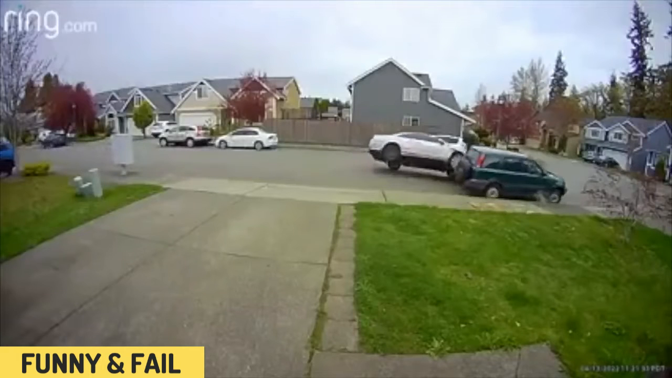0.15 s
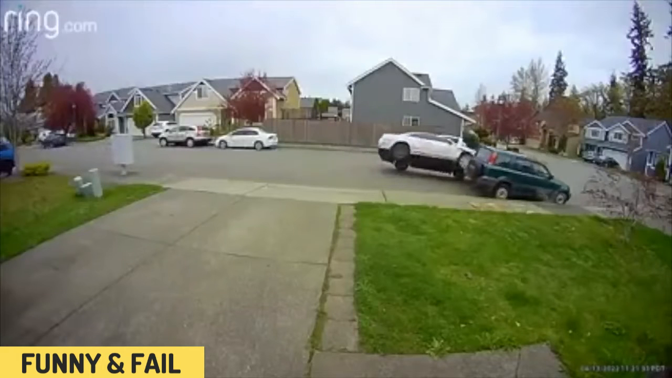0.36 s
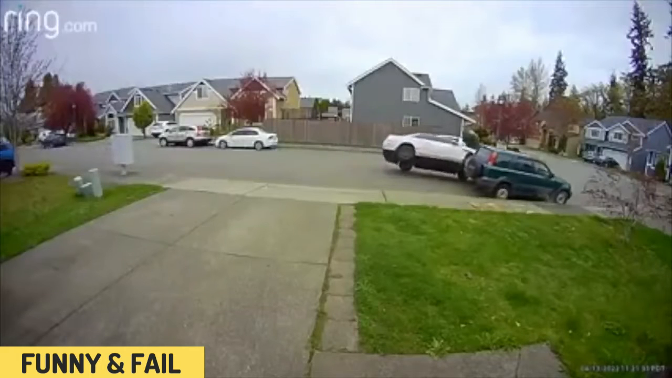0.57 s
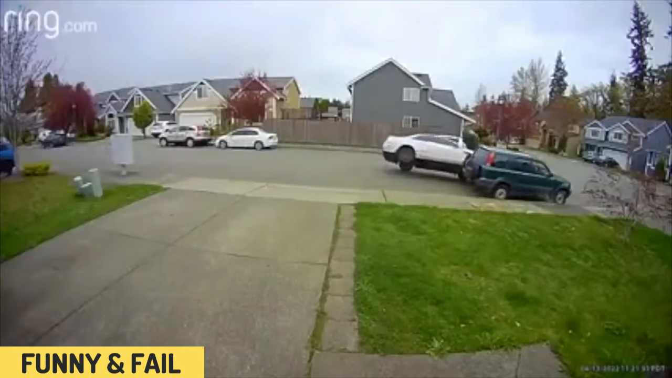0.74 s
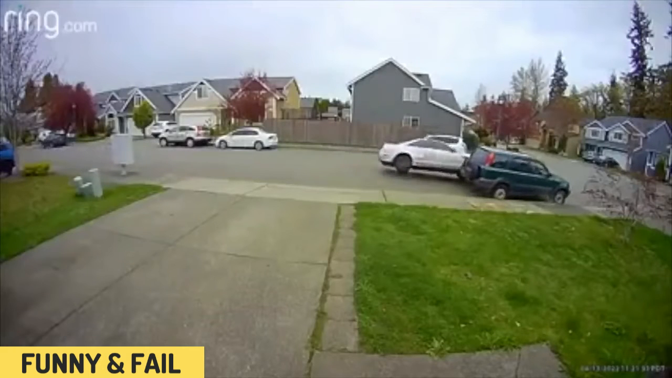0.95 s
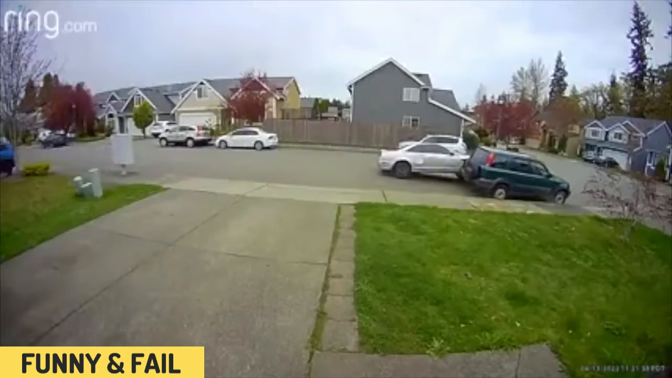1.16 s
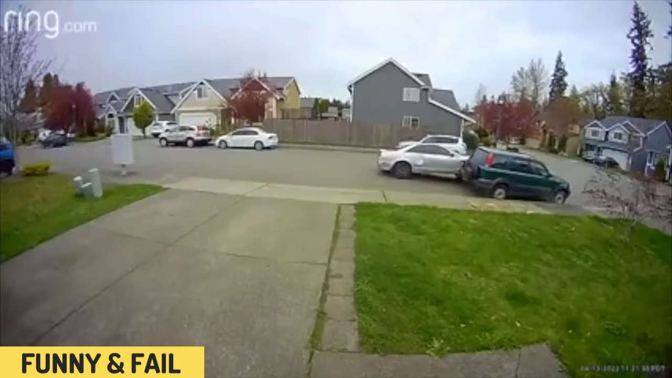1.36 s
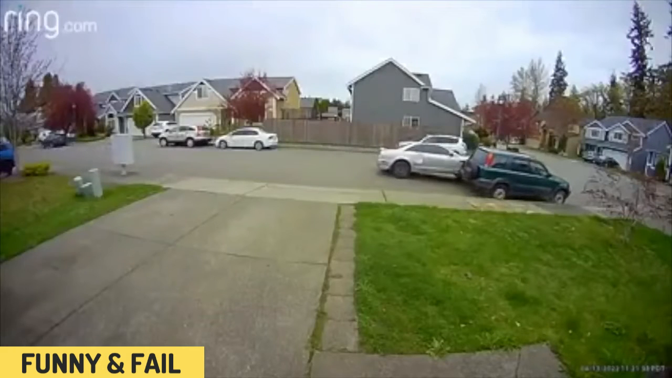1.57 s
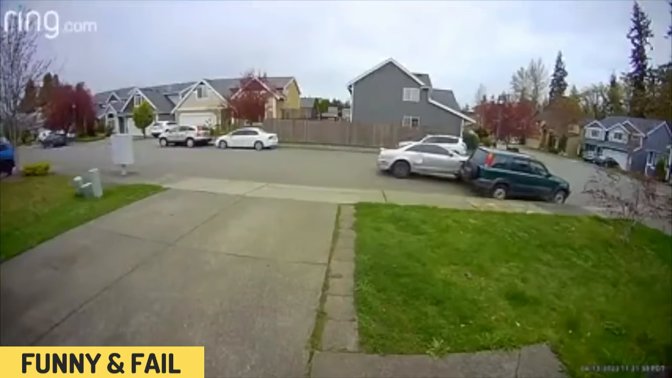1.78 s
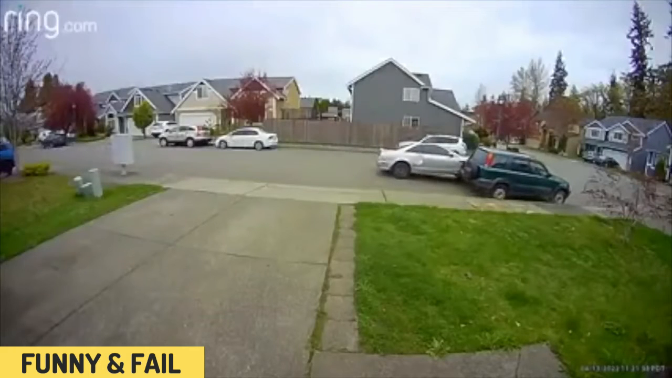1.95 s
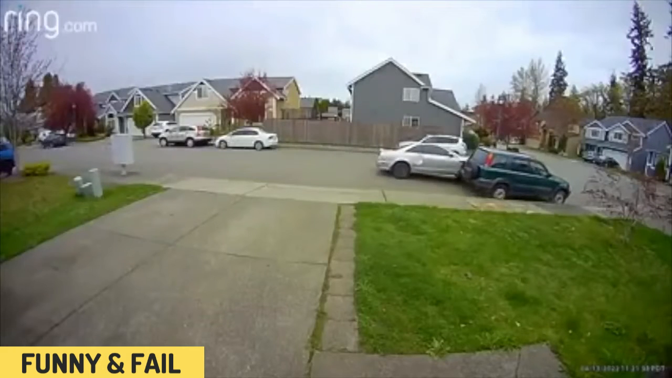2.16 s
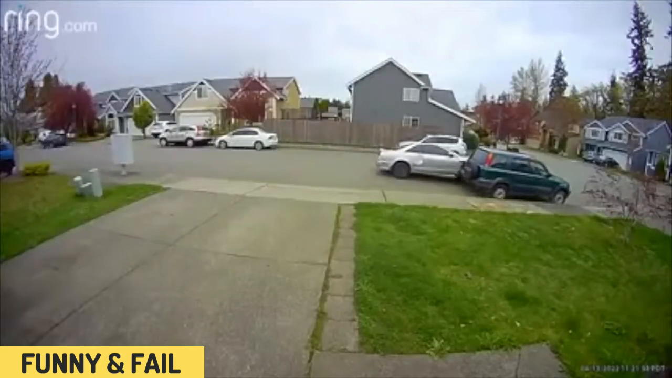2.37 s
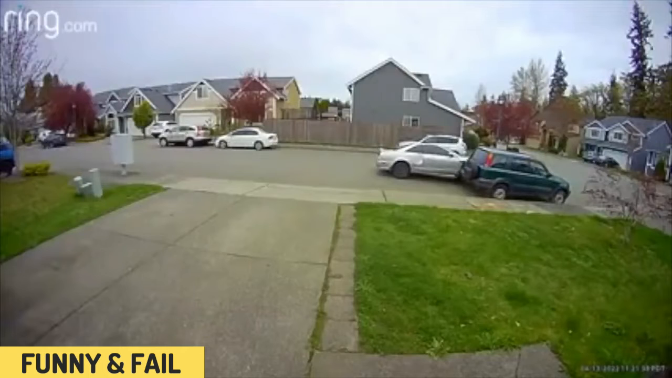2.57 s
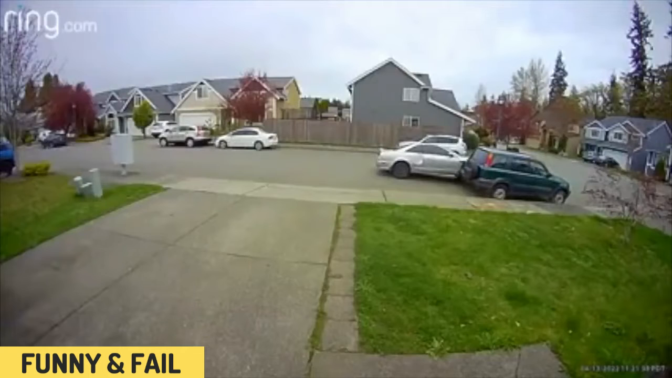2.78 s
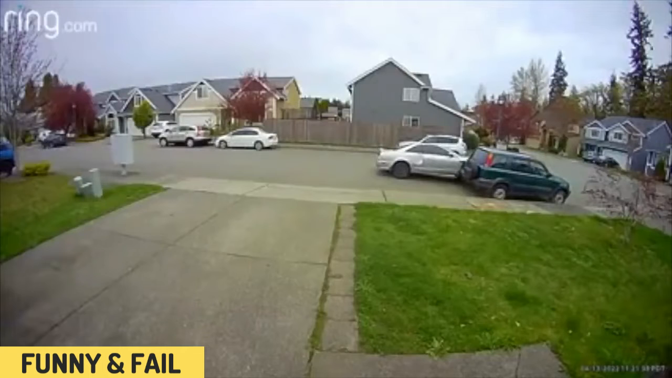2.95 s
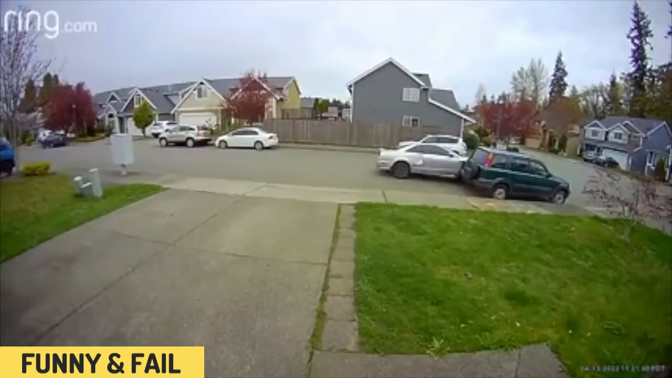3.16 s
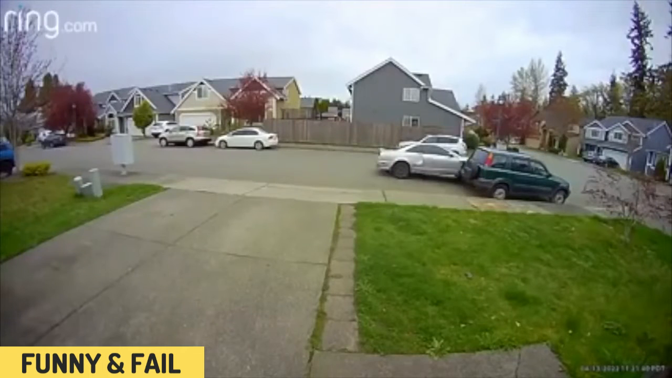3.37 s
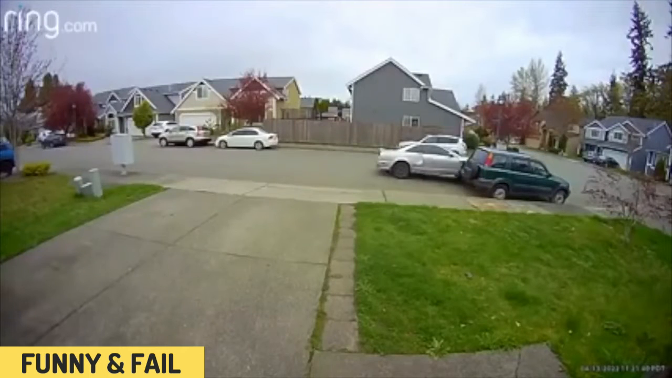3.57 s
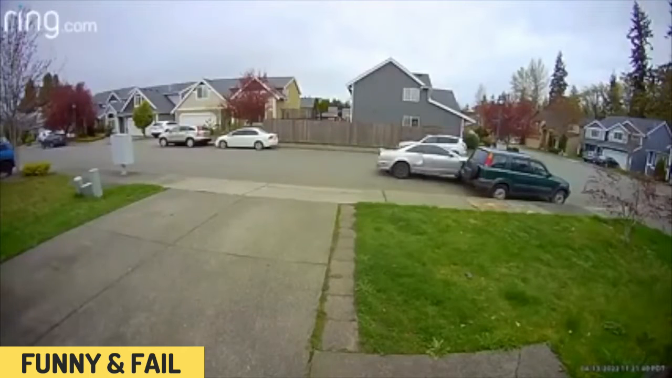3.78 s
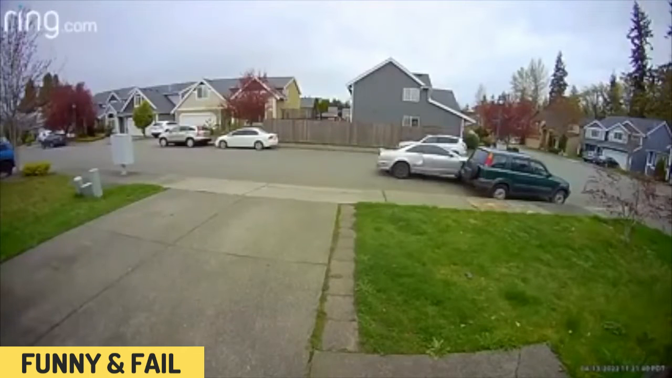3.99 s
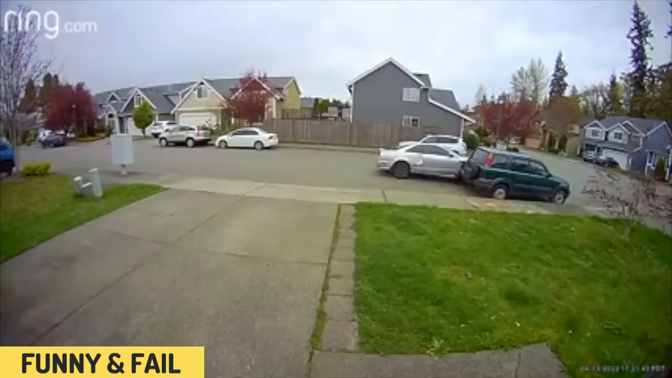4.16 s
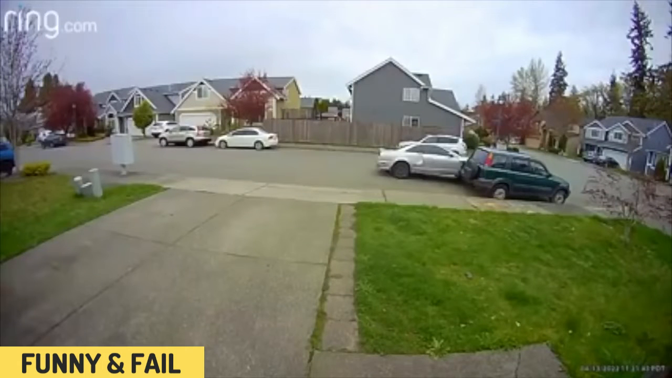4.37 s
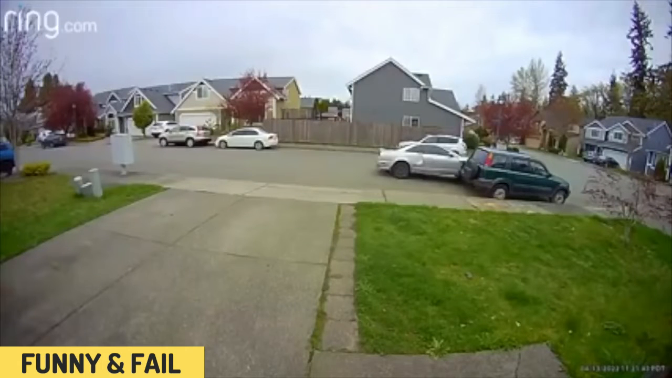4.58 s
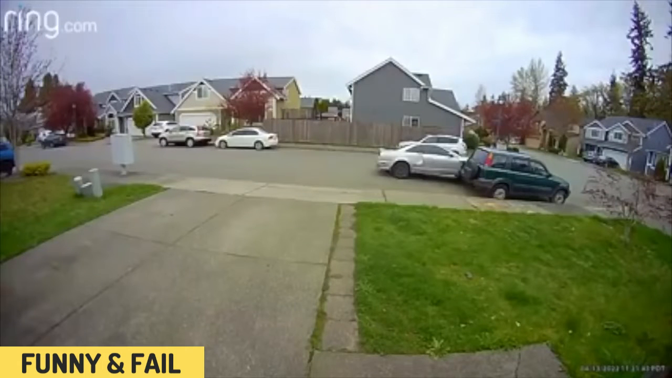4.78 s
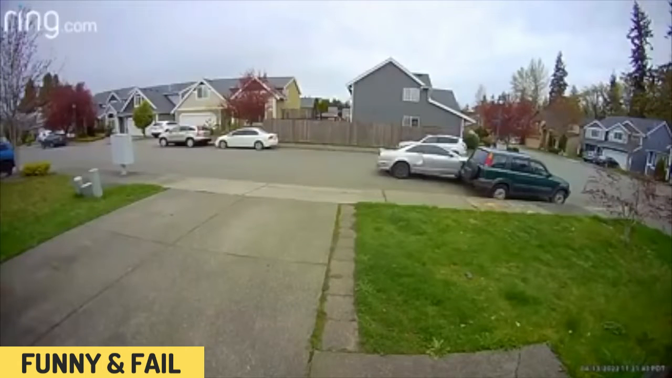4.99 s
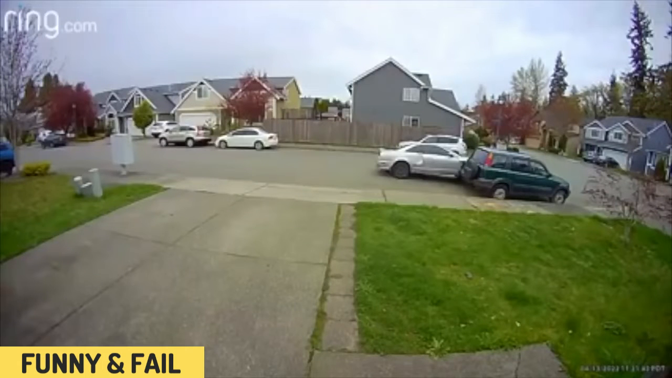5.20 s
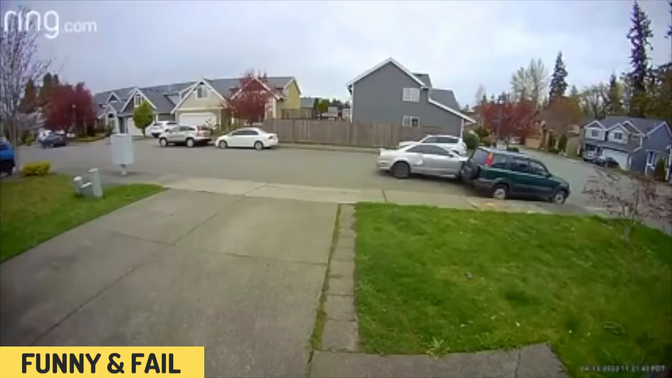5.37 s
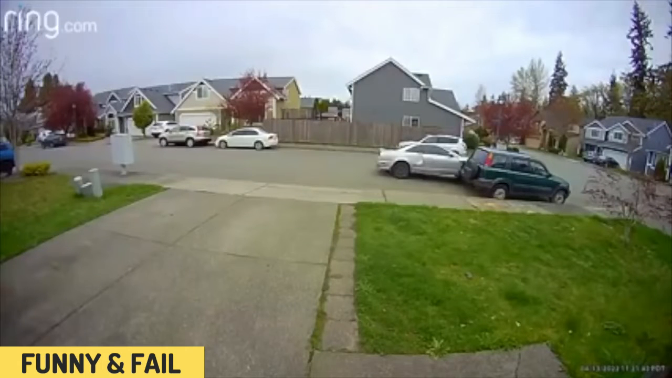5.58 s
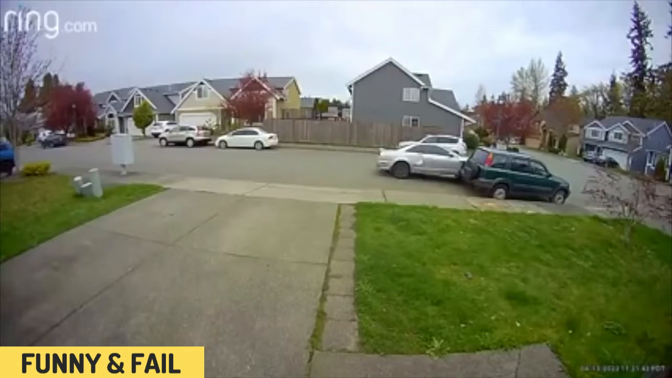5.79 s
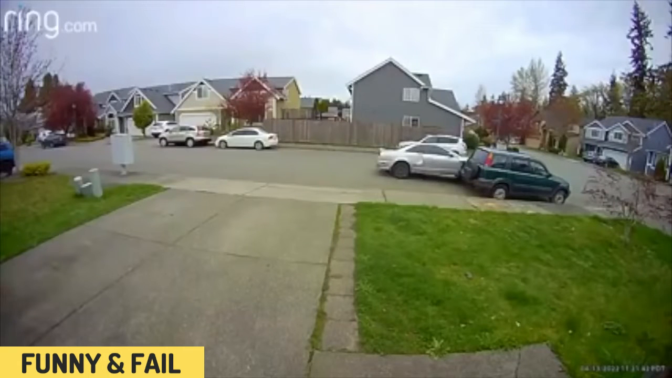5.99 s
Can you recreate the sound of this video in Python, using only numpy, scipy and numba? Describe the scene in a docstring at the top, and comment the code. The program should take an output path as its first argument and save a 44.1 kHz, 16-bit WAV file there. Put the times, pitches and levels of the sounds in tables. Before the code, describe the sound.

A car smashes into a parked car with a harsh, overloaded metal crunch, slams back down, scrapes and knocks to rest under thin microphone hiss.

```python
"""On a residential street a car rams a parked one, rides up on it, drops back and settles.
Random snaps and small rings make the crumpling panels boom and crackle; filtered noise makes parts scrape.
Knocks and taps ring metal parts, shards tick on the road, and a noise tail echoes it off house fronts.
A small outdoor camera hears it through a hissing microphone with a sharp treble resonance, and overloads."""
import sys
import numpy as np
from scipy import signal
from scipy.fft import rfft, irfft
from scipy.io import wavfile
from scipy.ndimage import uniform_filter1d
from numba import njit

SR = 44100
rng = np.random.default_rng(int(sys.argv[2]) if len(sys.argv) > 2 else 0)


def store_wav(level_fs):
    """Save 16-bit WAV to argv[1]."""
    pcm = np.round(np.clip(np.atleast_2d(level_fs), -1, 1) * 32767)
    wavfile.write(sys.argv[1], SR, pcm.T.astype(np.int16))


N = 266319
T = np.arange(N) / SR


def undb(db):
    """Turn decibels into a gain."""
    return 10 ** (np.asarray(db) / 20)


def unit(x):
    """Scale to an average (rms) level of 1."""
    return x / np.sqrt(np.mean(x ** 2))


def steady(x, span_s):
    """Hold the rms level near 1 over spans of the given length."""
    power = np.abs(uniform_filter1d(x ** 2, int(span_s * SR) + 1))
    return x / np.sqrt(power + 1e-9)


def noise():
    """White noise of rms 1."""
    return rng.standard_normal(N)


def colour(x, points):
    """Filter x to the spectrum drawn by (Hz, dB) points, without changing the power of white noise."""
    hz, db = np.transpose(points)
    size = 4096
    grid_hz = np.arange(size // 2 + 1) * SR / size
    gain = undb(np.interp(np.log(grid_hz + 1), np.log(hz), db))
    # fold the cepstrum so that the filter never sounds ahead of its input
    cepstrum = irfft(np.log(gain))
    cepstrum[1:size // 2] *= 2
    cepstrum[size // 2 + 1:] = 0
    response = irfft(np.exp(rfft(cepstrum)))
    return signal.fftconvolve(x, response / np.linalg.norm(response))[:N]


def dull(x, hz):
    """A softer contact loses the treble above hz."""
    return signal.lfilter(*signal.butter(2, min(hz, .4 * SR), fs=SR), x)


def wander(span_s):
    """A value of spread 1 that drifts at random over spans of the given length."""
    size = int(span_s * SR) + 1
    return unit(uniform_filter1d(uniform_filter1d(noise(), size), size))


def flutter(span_s, depth_db):
    """A gain that wanders with a spread of so many dB."""
    return undb(depth_db * wander(span_s))


def ebb(db, fall_db_s, from_s=0):
    """A gain that holds until from_s, then loses so many dB each second."""
    return undb(db - fall_db_s * np.maximum(T - from_s, 0))


def swell(s, length, rise=0.93):
    """A push that builds, holds and lets go; rise is a share of the length."""
    out, span = np.zeros(N), slice(max(int(s * SR), 0), int((s + 2 * length) * SR))
    age = np.maximum(T[span] - s, 0) / length
    out[span] = (1 - np.exp(-age / rise)) * np.exp(-age ** 4)
    return out


def fade(s, t60):
    """Die away from a moment of contact, losing 60 dB in t60 seconds."""
    out, span = np.zeros(N), slice(int(s * SR), int((s + 2 * t60) * SR))
    out[span] = np.exp(-np.log(1000) * (T[span] - s) / t60)
    return out


def ring(modes):
    """All the notes of an object after one tap, with a peak of 1."""
    t = T[:SR // 2]
    out = sum(undb(db - 60 * t / t60) * np.sin(2 * np.pi * hz * t) for hz, db, t60 in modes)
    return out / np.abs(out).max()


def strike(taps, modes):
    """Ring an object's modes with taps of (s, dB)."""
    force = np.zeros(N)
    for s, db in taps:
        force[int(s * SR)] += undb(db)
    return signal.fftconvolve(force, ring(modes))[:N]


def resonance(x, s, hz, q):
    """One resonance excited by x, at an even level, from 0.05 s before s to 0.25 s after it."""
    out, span = np.zeros(N), slice(int(s * SR) - SR // 20, int(s * SR) + SR // 4)
    b, a = signal.iirpeak(hz, max(q, 1), fs=SR)
    once = signal.lfilter(b, a, x[span])
    out[span] = steady(signal.lfilter(b, a, once), 0.014)  # filtered twice: a narrower note
    return out


def fractures(rate, spread_db):
    """Random tiny snaps, so many per second: many weak, a few strong."""
    size = undb(spread_db * np.minimum(rng.exponential(size=N), 4))
    return unit((rng.random(N) < rate / SR) * size * np.sign(noise()))


@njit
def grains(start, hz, t60, size):
    """Add up small decaying rings, each a turning, shrinking complex number."""
    out = np.zeros(N)
    for k in range(len(start)):
        pole = np.exp((2j * np.pi * hz[k] - np.log(1000) / t60[k]) / SR)
        z = size[k] + 0j
        for i in range(int(start[k]), min(N, int(start[k] + t60[k] * SR))):
            z *= pole
            out[i] += z.imag
    return out


def fragments(count, t60, spread_db):
    """Snaps at random moments; each rings a piece of its own pitch, most of them weakly."""
    when, pitch, life, luck = rng.random((count, 4)).T
    size = undb(spread_db * np.minimum(-np.log(luck), 4))
    hz = 200 + 7000 * pitch
    return unit(grains(when * N, hz, t60 * (.5 + life), size))


# The sound colour of crumpling metal. Each row: pitch in Hz, relative level in dB.
METAL_COLOUR = [(170, -37.5), (300, -3), (430, -0.5), (560, -4), (900, 2.5), (1200, -3.5), (1480, -2),
                (1850, -1), (2900, -3), (3600, -6), (4700, -13.5), (5600, -19), (7000, -46)]
# The colour of the hollow bodies booming. Each row: pitch in Hz, relative level in dB.
BOOM_COLOUR = [(90, -51), (160, -11), (195, -6.5), (235, 4), (275, 1), (340, -14.5), (480, -31),
               (900, -61.5)]
# The colour of splintering plastic and glass. Each row: pitch in Hz, relative level in dB.
SPLINTER_COLOUR = [(3000, -33.5), (4800, -9.5), (5450, 0.5), (5850, 4.5), (6500, 1), (6850, -12.5),
                   (7400, -46.5)]
# the crush starts at full force and dies away as the cars slow: level at 0 s (dB), fall (dB per s)
CRACKLE_DB, CRACKLE_FALL_DB_S = -10, 25
BOOM_DB, BOOM_FALL_DB_S = -22, 14.5
SPLINTER_DB, SPLINTER_FALL_DB_S = -15, 28.5
# single buckles stand out of the crush: level (dB re the crackle), size spread (dB)
BUCKLE_DB, BUCKLE_SPREAD_DB = -5, 3.5


def crumple():
    """Panels buckle in dense snaps, plastic and glass splinter, the hollow bodies boom."""
    metal_snaps = fragments(count=15000, t60=0.15, spread_db=0.5) + undb(1.5) * fractures(3200, 2)
    crackle = steady(colour(metal_snaps, METAL_COLOUR), 0.045)
    boom = steady(colour(fractures(500, 8.3), BOOM_COLOUR), .03)
    brittle_snaps = fragments(count=14000, t60=0.093, spread_db=2.5) + fractures(2400, 6.2)
    splinter = steady(colour(brittle_snaps, SPLINTER_COLOUR), 0.024)
    crackle = crackle + undb(BUCKLE_DB) * buckles()
    crackle = crackle * flutter(span_s=0.008, depth_db=0.5)  # the metal gives way in jerks
    crush = crackle * ebb(CRACKLE_DB, CRACKLE_FALL_DB_S)
    crush = crush + boom * ebb(BOOM_DB, BOOM_FALL_DB_S)
    crush = crush + splinter * ebb(SPLINTER_DB, SPLINTER_FALL_DB_S)
    return crush * (1 - settled())


def buckles():
    """Folds of sheet metal pop one by one, each with a brief note of its own."""
    when, pitch, luck = rng.random((900, 3)).T
    size = undb(BUCKLE_SPREAD_DB * np.minimum(-np.log(luck), 3))
    hz = 650 * 5 ** pitch
    cycles = 34  # each note fades by 60 dB in this many vibrations
    return steady(grains(when * N, hz, cycles / hz, size), .12)


# the crush gives way to grinding: middle and length of the handover (s)
SETTLE_S, HANDOVER_S = 0.893, 0.083


def settled():
    """Share of the motion that has passed from crushing to grinding, 0-1."""
    return np.clip((T - SETTLE_S) / HANDOVER_S + .5, 0, 1)


# Short knocks, from hard blows to faint taps, with a click on either side of the brief cut-out.
# Each row: start in seconds, length in seconds, boom in dB, crack in dB,
# pitch of the ringing part in Hz, its level in dB, Hz above which the crack is dulled.
KNOCK_EVENTS = [(0.051, .008, -29.5, -24, 1150, -15, 5000), (0.074, 0.031, -32.5, -22, 846, -15.5, 5000),
                (0.129, 0.026, -25, -24, 700, -20, 4000), (0.248, 0.047, -29.5, -26, 572, -21.5, 5000),
                (0.37, 0.012, -23, -19, 1026, -11.5, 5040), (0.467, 0.0053, -25, -28, 421, -20.5, 3000),
                (0.524, 0.0028, -35, -15, 2520, -9.5, 6500), (0.554, .004, -37, -23, 960, -18, 5000),
                (0.646, 0.0039, -36, -26.5, 2630, -15, 6500), (0.674, 0.0093, -30, -21.5, 1720, -14, 5000),
                (.689, 0.0067, -38.5, -20.5, 2250, -16.5, 6000), (0.699, .005, -37, -25, 2080, -18.5, 6000),
                (0.744, 0.012, -32, -22, 1000, -22, 3000), (1.0233, 0.0077, -22, -17.5, 2520, -13, 8000),
                (1.026, 0.007, -26, -17, 1100, -17, 3500), (1.038, 0.008, -25, -20.5, 2400, -25, 4020),
                (1.793, 0.019, -26, -27, 895, -22, 2600), (1.809, 0.018, -48, -34.5, 1740, -35, 2600),
                (1.926, 0.067, -43, -36, 318, -34.5, 6000), (2.267, 0.066, -46, -47, 990, -38.5, 1300),
                (2.285, 0.011, -19.5, -45, 765, -36.5, 1300), (2.304, 0.018, -26.5, -30, 314, -18.5, 2210),
                (2.322, 0.018, -31, -27, 710, -31, 2000), (2.336, 0.0075, -39, -32, 960, -35, 1800),
                (2.354, .018, -46, -53, 680, -33.5, 1810), (2.377, 0.027, -42, -50, 382, -33, 1390),
                (2.402, 0.07, -48, -51, 790, -50, 1310), (2.829, 0.023, -43.5, -43, 1100, -45.5, 5000),
                (2.871, 0.007, -38.5, -35.5, 650, -35, 3980), (4.63, 0.089, -74, -76, 383, -62, 1985)]
# The colour of a cracking contact. Each row: pitch in Hz, relative level in dB.
CRACK_COLOUR = [(170, -24.5), (320, -3.5), (680, 3), (1100, 6), (1420, -13.5), (1800, -2), (2400, -4),
                (3000, -10), (3450, -25), (4000, 0.5), (4700, -33.5), (7000, -42)]
# The car drops back onto its wheels, the second time in two bumps. Each row: moment in seconds, level in dB.
DROP_TAPS = [(1.0275, -22), (2.289, -23), (2.311, -22)]
# The hollow body's notes, rung by the drops. Each row: pitch in Hz, relative level in dB,
# seconds to fade by 60 dB.
BODY_MODES = [(226, -23.5, 0.029), (244, -12, 0.081), (320, -15, 0.066), (561, -3, 0.11), (677, 2, 0.11),
              (891, -24, 0.032)]


def knocks():
    """Each knock mixes a short crack, a ringing note and a low boom; the drops ring the hollow body."""
    crack = steady(colour(fractures(2500, 2.8), CRACK_COLOUR), 0.013)
    splinter = undb(-11.5) * steady(colour(noise(), SPLINTER_COLOUR), 0.012)  # dB re the crack
    boom = steady(colour(noise(), BOOM_COLOUR), 0.0025)
    contact, out = noise(), strike(DROP_TAPS, BODY_MODES)
    for s, length, boom_db, crack_db, hz, ring_db, top_hz in KNOCK_EVENTS:
        note = resonance(contact, s, hz, q=4.6) * undb(ring_db)
        crunch = (dull(crack, top_hz) + splinter) * undb(crack_db)
        out = out + swell(s, length, rise=.06) * (crunch + note + boom * undb(boom_db))
    return out


# Metal dragging on metal. Each row: start in seconds, length in seconds, rasp in dB, splinter in dB,
# bumper shell in dB, pitch of the singing panel in Hz, Hz above which the rasp is dulled.
SCRAPE_EVENTS = [(0.045, 0.125, -18.5, -31.5, -21.5, 1098, 2195),
                 (0.209, 0.057, -22, -12, -21.5, 3730, 7000), (0.331, 0.071, -21, -21, -19, 1136, 4950),
                 (0.478, 0.017, -19.5, -21.5, -23.5, 1810, 6000),
                 (0.542, 0.075, -26, -27.5, -23.5, 3000, 6000), (0.601, 0.041, -24, -25.5, -32, 937, 6000),
                 (0.657, 0.087, -22.5, -25, -27, 1217, 7000), (0.741, 0.013, -20, -30, -28, 1307, 5000),
                 (0.762, 0.037, -28.5, -29, -34, 886, 2500), (0.844, 0.037, -26, -28.5, -30, 5420, 4000),
                 (1.147, 0.016, -30, -28.5, -29, 5360, 5000), (1.159, 0.034, -31.5, -36.5, -26, 2180, 4000),
                 (1.432, 0.042, -46, -30, -23.8, 900, 6000), (1.478, 0.092, -45, -52, -37, 2550, 5870),
                 (1.58, 0.11, -63, -46, -54, 2480, 7000), (1.694, 0.061, -41.5, -30, -60, 1480, 5000),
                 (1.748, 0.036, -36.5, -46, -40, 1500, 3480), (1.786, 0.023, -25, -45, -31, 1710, 2600),
                 (1.842, 0.05, -30.5, -37.5, -28.5, 940, 2400), (1.937, 0.057, -33, -33, -40, 1916, 7900)]
# The bumper shell's notes, rattled by every scrape. Each row: pitch in Hz, relative level in dB,
# seconds to fade by 60 dB.
SHELL_MODES = [(720, -15.5, .06), (792, -3, 0.089), (932, -2, 0.089), (1076, -4, 0.098),
               (1780, -19.5, 0.071), (1862, -2, 0.08), (2136, -4.5, 0.14), (2230, -7, 0.081),
               (2570, -2, .04), (2990, 6.5, 0.037), (3700, -5, 0.062), (5180, 0, .05), (5680, -4, 0.063)]
SCRAPE_RING_DB = -1.5  # the singing panel, re the rasp
SCRAPE_BEND = .035  # the bending panel's pitch wavers with a spread of this share


def scrapes():
    """Edges stick and slip in short rasps; each rattles the bumper shell and makes a bending panel sing."""
    rasp_snaps = fractures(1700, 1.1) + fragments(count=12000, t60=0.071, spread_db=7.0)
    rasp = steady(colour(rasp_snaps, METAL_COLOUR), 0.012)
    splinter = steady(colour(fractures(3200, 2.6), SPLINTER_COLOUR), 0.0097)
    shell = steady(signal.fftconvolve(fractures(2200, 1.5), ring(SHELL_MODES))[:N], 0.013)
    slow_noise = colour(noise(), [(30, 1), (80, -4), (250, -24), (900, -55)])
    slips = undb(SCRAPE_RING_DB) * steady(slow_noise, .03)
    bent_time = np.cumsum(1 + SCRAPE_BEND * wander(span_s=.018)) / SR
    out = 0
    for s, length, rasp_db, splinter_db, shell_db, hz, top_hz in SCRAPE_EVENTS:
        sing = np.sqrt(2) * slips * np.sin(2 * np.pi * hz * bent_time)
        drag = undb(rasp_db) * (dull(rasp, top_hz) + sing)
        drag = drag + splinter * undb(splinter_db) + shell * undb(shell_db)
        out = out + swell(s, length, rise=.05) * drag
    return out


# Bodies buckling, then rocking on their springs. Each row: start in seconds, length in seconds, level in dB.
THUD_PUSHES = [(0, 0.01, -13.5), (0.052, 0.034, -14.5), (0.123, 0.029, -10.5), (0.273, 0.032, -13.5),
               (0.348, 0.045, -11.5), (0.396, 0.054, -9.5), (0.479, 0.053, -17), (0.776, 0.022, -21),
               (1.009, 0.012, -22.5), (1.163, 0.027, -24.5), (1.267, 0.04, -41), (1.59, 0.068, -36.5),
               (1.639, 0.02, -26.5), (1.698, 0.056, -29), (1.747, 0.025, -26), (2.231, 0.022, -40),
               (2.424, 0.011, -35), (3.212, 0.043, -51), (3.27, 0.025, -50), (4.522, 0.14, -52)]


def thuds():
    """Soft, heavy pushes reach only the lowest body resonance."""
    boom = steady(colour(noise(), BOOM_COLOUR), 0.0042)
    return boom * sum(undb(db) * swell(s, length, rise=0.32) for s, length, db in THUD_PUSHES)


# one low note: moment (s), level (dB), pitch (Hz), time to fade by 60 dB (s)
SLAM_S, SLAM_DB, SLAM_HZ, SLAM_T60_S = 1.0235, -3.5, 258, .085


def slam():
    """The first drop slams the floor pan: it booms once as the car lands, and dies away quickly."""
    return undb(SLAM_DB) * fade(SLAM_S, SLAM_T60_S) * np.sin(2 * np.pi * SLAM_HZ * (T - SLAM_S))


# Each lurch sets the wreck grinding and swaying. Each row: start in seconds, grind in dB, sway in dB,
# fall in dB per second.
LURCH_EVENTS = [(.74, -22.5, -29.5, 31.5), (1.27, -37.5, -54.5, 51), (1.829, -33.5, -47.5, 42.5),
                (2.3, -46.5, -50.5, 26), (2.88, -58, -61.5, 38)]
# The colour of the grinding. Each row: pitch in Hz, relative level in dB.
GRIND_COLOUR = [(170, -29.5), (300, -5.5), (520, -5.5), (950, 3), (1150, -3.5), (1450, -10), (1850, -3),
                (2300, -5.5), (2950, -4.5), (3600, -7), (4400, -14), (5500, -11.5), (7000, -28.5)]
LURCH_RISE_S = 0.0088  # every lurch builds alike


def settle():
    """The wreck grinds to rest in lurches: finer, weaker friction over the swaying bodies."""
    friction = fractures(4500, 1.6) + undb(-3.0) * fragments(count=12000, t60=0.1, spread_db=5.5)
    grind = steady(colour(friction, GRIND_COLOUR), 0.061)
    grind = grind * flutter(span_s=.025, depth_db=2.0)
    sway = steady(colour(noise(), BOOM_COLOUR), 0.027)
    out = 0
    for s, grind_db, sway_db, fall in LURCH_EVENTS:
        onset = np.clip((T - s) / LURCH_RISE_S, 0, 1)
        out = out + onset * (grind * ebb(grind_db, fall, s) + sway * ebb(sway_db, fall, s))
    return settled() * out


# Shards hitting the road. Each row: moment in seconds, level in dB, seconds to fade by 60 dB, pitch in Hz.
SHARD_TICKS = [(0.722, -14, 0.013, 5970), (0.726, -11.5, 0.052, 5760), (1.527, -24.5, 0.17, 6280),
               (1.9454, -12.5, 0.011, 5920), (2.121, -23, 0.024, 5970), (2.119, -31.5, 0.061, 3060),
               (2.531, -25, 0.012, 6460)]


def shards():
    """Small hard pieces give brief bright ticks, each at its own pitch."""
    contact, out = noise(), 0
    for s, db, t60, hz in SHARD_TICKS:
        tick = steady(resonance(contact, s, hz, q=17), 0.0027)
        out = out + undb(db) * fade(s, t60) * tick
    return out


# The colour of the fine debris. Each row: pitch in Hz, relative level in dB.
GRIT_COLOUR = [(1200, -20), (2000, -4), (3000, 1.5), (3900, -2.5), (4800, -6), (7000, -13)]
GRIT_S, GRIT_LENGTH_S, GRIT_DB = 1.42, 0.84, -44  # start (s), length (s), level (dB)


def grit():
    """Crumbs of glass and plastic skitter over the road as the car slides down."""
    crumbs = steady(colour(fragments(count=20000, t60=0.017, spread_db=3.0), GRIT_COLOUR), .025)
    return undb(GRIT_DB) * crumbs * swell(GRIT_S, GRIT_LENGTH_S, rise=.05)


# A loose panel clanks and rattles. Each row: moment in seconds, level in dB.
CLANK_TAPS = [(5.434, -35.5), (5.443, -30.5), (5.476, -45), (5.509, -47.5), (5.555, -47), (5.608, -51),
              (5.645, -51)]
# The loose panel's notes. Each row: pitch in Hz, relative level in dB, seconds to fade by 60 dB.
PANEL_MODES = [(785, -6, .09), (850, -14, .14), (1206, -7, .2), (1290, -4, .08), (1520, -13, .05),
               (1750, 2, .085), (1790, -1, .06), (2530, -21, .12), (3644, -5, .12)]


def clank():
    """A loose panel drops and bounces: each touch rings it briefly, with a little grit."""
    scuff = colour(noise(), [(250, 1.5), (550, -20), (800, -3), (1300, -4), (1800, -8.5),
                             (2200, -22), (5000, -29), (7000, -33)])
    touches = sum(undb(db - 26) * fade(s, t60=0.15) for s, db in CLANK_TAPS)
    return strike(CLANK_TAPS, PANEL_MODES) + scuff * touches


# Strained parts squeak. Each row: start in seconds, length in seconds, level in dB, pitch in Hz.
SQUEAK_TONES = [(5.424, .03, -51, 5170), (5.483, 0.048, -54, 3610), (5.548, 0.52, -54, 5130),
                (5.594, 0.21, -58, 3020), (5.62, 0.15, -68, 2900)]


def squeaks():
    """Strained parts rub in faint, thin, shimmering tones."""
    waver = steady(colour(noise(), [(8, 0), (45, 1), (130, -11), (450, -40)]), .025)
    out = 0
    for s, length, db, hz in SQUEAK_TONES:
        out = out + undb(db) * swell(s, length, rise=0.093) * np.sin(2 * np.pi * hz * T)
    return waver * out


def street(x, t60=0.11, wet_db=-16, delay_s=0.029):
    """House fronts scatter a dull, late echo."""
    scatter = colour(noise(), [(100, -4.0), (900, 0.0), (3000, -6.0), (7000, -8.0)])
    tail = (scatter * fade(delay_s, t60))[:SR]
    tail = tail / np.abs(rfft(tail))[200:3000].mean()  # average gain 1 from 200 to 3000 Hz
    return x + undb(wet_db) * signal.fftconvolve(x, tail)[:N]


# The colour of the broad noise floor. Each row: pitch in Hz, relative level in dB.
FLOOR_COLOUR = [(25, -13), (70, -9.5), (150, -2), (230, 7), (400, -5), (650, -5), (1050, 0), (1600, -8),
                (2400, 1), (3100, 3), (3900, 2), (4700, -7.5), (6500, 1), (8000, -26.5)]
# The colour of the treble hiss. Each row: pitch in Hz, relative level in dB.
HISS_COLOUR = [(3500, -42), (5050, -21.5), (5350, -2), (5700, -5.5), (6000, 3), (6130, -4), (6380, -0.5),
               (6650, -10), (6900, -11.5), (7200, -29.5), (7600, -48)]
# The hiss peaks at the microphone's resonance. Each row: pitch in Hz, relative level in dB.
HISS_PEAK_COLOUR = [(5600, -35.5), (6100, -17), (6240, -3), (6410, -2), (6560, -18), (7000, -31)]
# The whistle flares up. Each row: start in seconds, length in seconds, level in dB.
WHISTLE_FLARES = [(3.378, 0.075, -30), (3.567, 0.063, -25)]
# Brief low bumps, below the wreck's own range. Each row: start in seconds, length in seconds, level in dB.
LOW_BUMPS = [(0, 0.013, -15), (0.04, 0.089, -33), (0.205, 0.032, -23.5), (1.015, 0.034, -27.5),
             (1.937, 0.024, -37), (2.51, 0.015, -55), (2.841, 0.038, -41.5)]
# the treble hiss holds, then ebbs: level (dB), held until (s), fall (dB per s)
HISS_DB, HISS_HOLD_S, HISS_FALL_DB_S = -38, 2.03, 4
HISS_PEAK_DB, HISS_PEAK_FALL_DB_S = -46, 0.8  # its resonant peak ebbs more slowly
# the hiss whistles faintly at its resonance: pitch (Hz), spread of its wander (Hz), level (dB)
WHISTLE_HZ, WHISTLE_WANDER_HZ, WHISTLE_DB = 6265, 8, -44.5


def microphone():
    """Broad floor, resonant treble hiss with a gliding band and a wavering whistle, and brief low bumps."""
    floor = undb(-55.5) * colour(noise(), FLOOR_COLOUR)
    hiss = flutter(span_s=0.095, depth_db=1.74) * colour(noise(), HISS_COLOUR)
    hiss = hiss * ebb(HISS_DB, HISS_FALL_DB_S, HISS_HOLD_S)
    peak = flutter(span_s=0.038, depth_db=2.0) * colour(noise(), HISS_PEAK_COLOUR)
    peak = peak * ebb(HISS_PEAK_DB, HISS_PEAK_FALL_DB_S, HISS_HOLD_S)
    waver = colour(noise(), [(10, -4.5), (30, 12.5), (90, -24.5), (400, -44.0), (1500, -97.5)])
    pitch_hz = WHISTLE_HZ + WHISTLE_WANDER_HZ * wander(span_s=.07)
    whistle = steady(waver, 0.061) * np.sin(2 * np.pi * np.cumsum(pitch_hz) / SR)
    flares = sum(undb(db) * swell(s, length) for s, length, db in WHISTLE_FLARES)
    whistle = whistle * (undb(WHISTLE_DB) + flares)
    shove = colour(noise(), [(15, -3.0), (30, -13), (65, -6.0), (110, 3.0), (250, -41.5), (900, -85.5)])
    bumps = steady(shove, 0.016) * sum(undb(db) * swell(s, length) for s, length, db in LOW_BUMPS)
    return floor + hiss + peak + sizzle() + whistle + bumps


# A gliding band in the hiss. Each row: moment in seconds, centre pitch in Hz, level in dB.
SIZZLE_GLIDE = [(2.9, 6450, -68), (3.7, 6580, -50), (4.399, 6800, -51.5), (4.898, 6850, -54),
                (5.3, 6600, -55.5), (5.6, 6390, -49.5), (6.0, 6280, -46.5)]


def sizzle():
    """A narrow band of the hiss glides up and back down: slow noise carried on a gliding tone."""
    s, hz, db = np.transpose(SIZZLE_GLIDE)
    band = steady(colour(noise(), [(20, 5.5), (70, -0.5), (160, -20.5), (500, -54.5)]), .06)
    tone = np.sin(2 * np.pi * np.cumsum(np.interp(T, s, hz)) / SR)
    return band * undb(np.interp(T, s, db, left=-120)) * tone


LOW_CUT_HZ = 180


def scene():
    """The wreck in the street, thinned in the bass by the small microphone, over its own noise."""
    crash = crumple() + scrapes() + knocks() + thuds() + slam() + settle()
    debris = shards() + grit() + clank() + squeaks()
    wreck = street(crash + debris)
    low_cut = signal.butter(8, LOW_CUT_HZ, "high", fs=SR, output="sos")
    return (signal.sosfilt(low_cut, wreck) + microphone())[None]  # one channel


# The sound cuts out for an instant. The two values: start in seconds, end in seconds.
CUTOUT = (2.853, 2.876)
TOP_HZ = 7200  # little is left above this


def record(dry):
    """The camera flattens the loudest peaks, cuts out for an instant and drops the top."""
    gate = np.where((T > CUTOUT[0]) & (T < CUTOUT[1]), undb(-42), 1)
    clipped = dry / (1 + (dry / .73) ** 6) ** (1 / 6)  # never beyond 0.73
    top_cut = signal.ellip(8, .1, 35, TOP_HZ, fs=SR, output="sos")
    return signal.sosfiltfilt(top_cut, clipped * gate)


dry = scene()
out = record(dry)
store_wav(out)
```